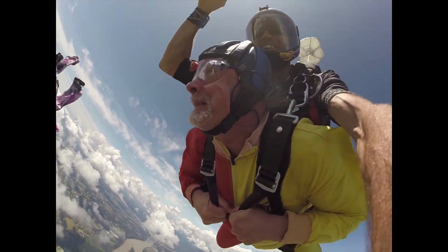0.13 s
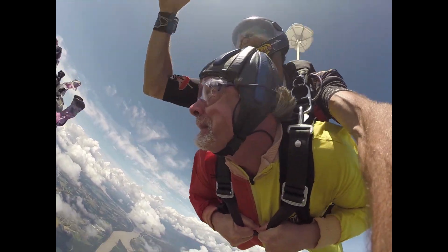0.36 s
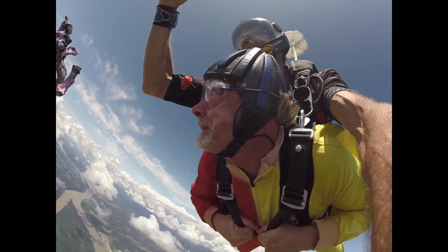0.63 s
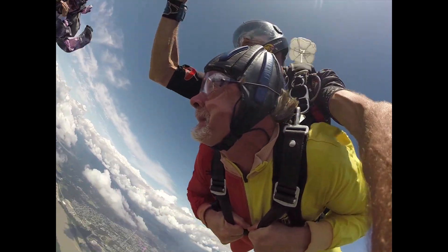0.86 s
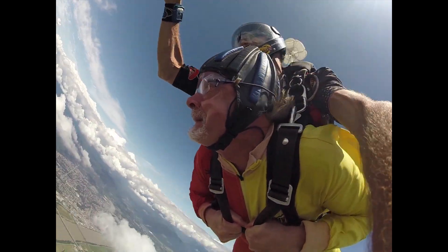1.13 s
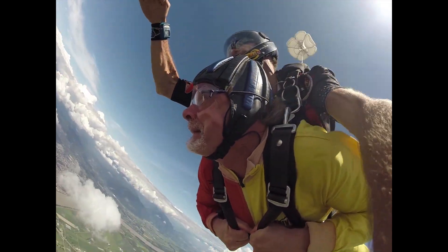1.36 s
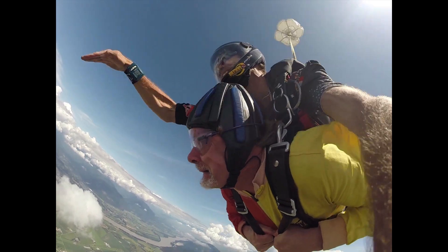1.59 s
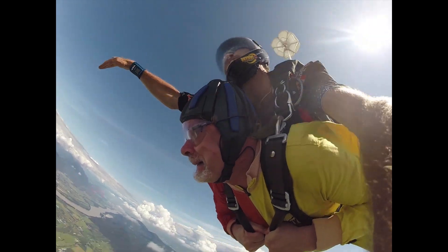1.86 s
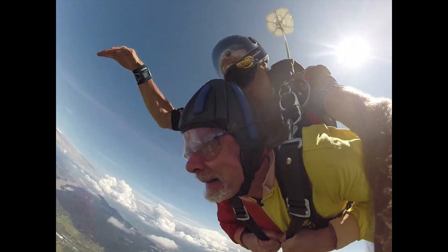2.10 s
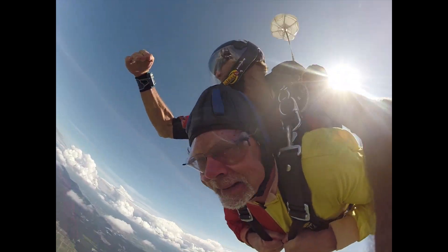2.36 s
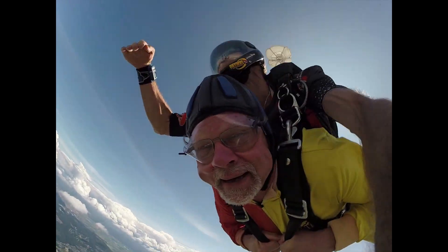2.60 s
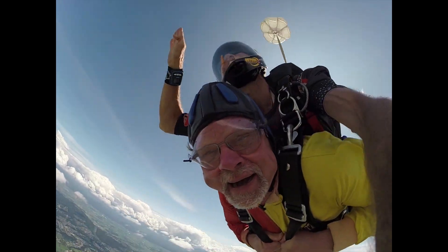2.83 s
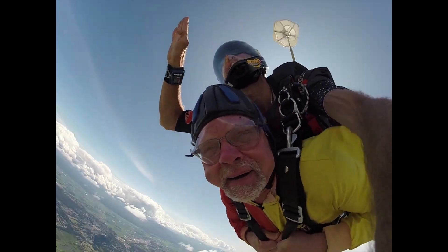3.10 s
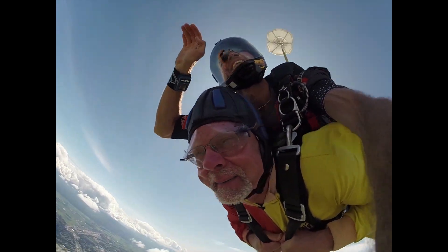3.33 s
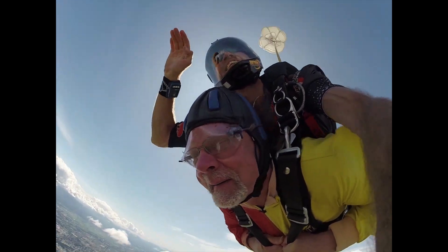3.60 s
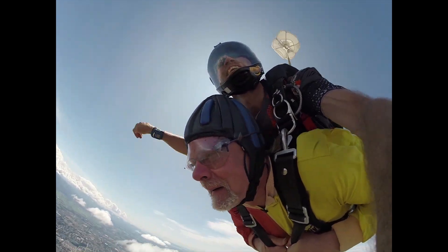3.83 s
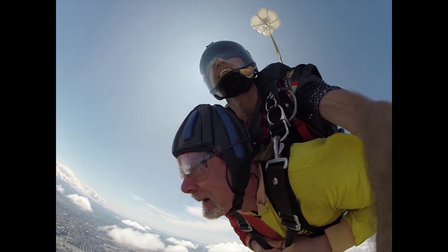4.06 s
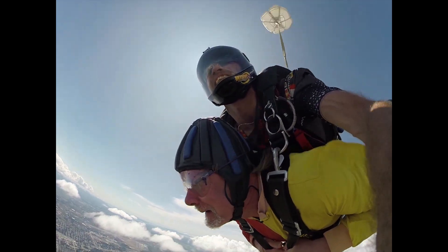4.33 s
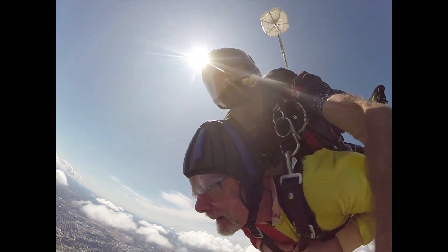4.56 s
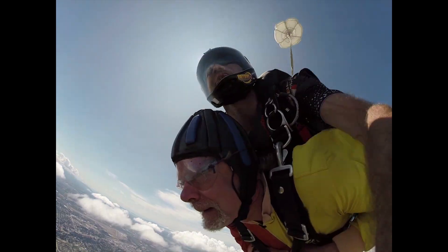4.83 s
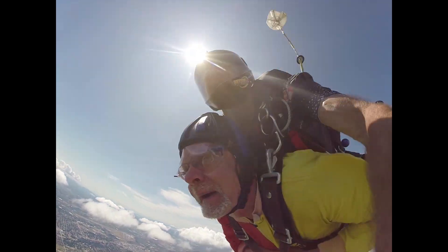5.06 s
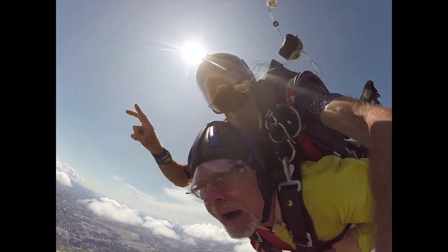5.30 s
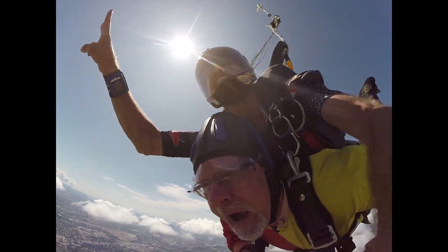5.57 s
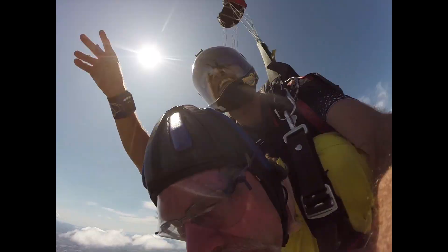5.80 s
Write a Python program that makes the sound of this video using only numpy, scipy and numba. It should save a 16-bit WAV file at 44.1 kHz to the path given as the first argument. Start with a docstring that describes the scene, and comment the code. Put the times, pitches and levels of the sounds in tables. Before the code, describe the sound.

Loud continuous freefall wind roars and buffets against an overloaded handheld camera microphone, gusting unevenly and gathering into a rising howl at the end.

```python
"""Freefall wind on a camera microphone

In the open air the airstream tears over the small port of a handheld camera microphone.
Big eddies buffet (low noise), smaller ones shed at the port roar (noise below a moving corner),
fine turbulence hisses on top (noise in half-octave bands). The pressure overloads the capsule, which
flattens the wave; the camera then evens the level and trims the bass and the top.
As the camera turns, the roar gathers into a rising howl (noise in a moving resonance)."""
import sys
import numpy as np
from scipy import signal
from scipy.io import wavfile
from scipy.ndimage import uniform_filter1d
from numba import njit

SR = 44100
rng = np.random.default_rng(int(sys.argv[2]) if len(sys.argv) > 2 else 0)


def pcm_store(signal):
    """Save signal as 16-bit PCM."""
    levels = np.round(np.clip(np.atleast_2d(signal), -1, 1) * 32767)
    wavfile.write(sys.argv[1], SR, levels.astype(np.int16).T)


def convert_level_to_amplitude(level_db):
    """Map a level in decibels to its linear amplitude factor."""
    exponent = np.asarray(level_db, float) / 20
    return 10 ** exponent


N = 261498

# colour of fine turbulence ahead of the port: (frequency [Hz], relative density [dB per Hz])
HISS_COLOUR = [(500, -4), (900, -0.5), (1500, -7.5), (2400, -10.5), (3400, -19.5), (5000, -21.5),
               (8000, -24.5), (13000, -27.5)]
# airstream at the port as the camera turns:
# (time [s], pressure [dB], eddy shedding rate [Hz], fine turbulence [dB])
FLOW = [(0.0, -8.5, 344, -19), (0.3, -8, 290, -19), (0.6, -11.5, 253, -21.5), (0.9, -11, 270, -20.5),
        (1.35, -11.5, 262, -21.5), (1.7, -9.5, 303, -22), (1.9, -10, 363, -23), (2.2, -6, 370, -21.5),
        (2.6, -6, 390, -22), (3.0, -5, 382, -20), (3.9, -6.5, 396, -20), (4.25, 0, 409, -20),
        (4.75, -2, 489, -20), (5.05, 0, 426, -18), (5.37, 0.5, 600, -18.5), (5.45, 0, 455, -17),
        (5.6, 1, 630, -20), (5.68, 0, 625, -15), (5.76, -1.5, 780, -16), (5.86, -7.5, 930, -15),
        (5.93, -16.5, 960, -16.5)]
# gusts: (peak time [s], level [dB], swell [s], added brightness [dB per two octaves])
GUSTS = [(0.22, 4, 0.42, -1), (0.66, 2, 0.12, 1), (1.18, 5, .1, -2.5), (1.6, 6, 0.25, -1),
         (2.38, -0.5, 0.11, 1.5), (2.52, -0.5, .08, 3), (3.09, -0.5, 0.047, 4.5), (3.2, 0, 0.07, 5),
         (3.33, 0.5, 0.071, 0.5), (4.2, 5.5, .12, -1.5), (4.67, 5, .2, 0), (5.37, 9, 0.15, -2),
         (5.85, 7, 0.16, -0.5)]

BREAK_S = 0.04   # fall of a gust
GUST_IN_ROAR, GUST_IN_BUFFET = 0.4, 0.42   # shares of a gust's dB
SHEDDING_HZ = 400   # reference rate for the per-octave settings

BUFFET_LOW_HZ, BUFFET_HIGH_HZ = 21.6, 179
BUFFET_DB = -10   # at 0 dB pressure and SHEDDING_HZ
BUFFET_FOLLOWS, BUFFET_DB_PER_OCTAVE = 0.12, -2.5   # dB per dB of pressure, change with shedding rate

ROAR_CORNER_HZ = 252 * 2 ** 0.87   # at SHEDDING_HZ
CORNER_FOLLOWS = 0.67   # octaves per octave of shedding rate
CORNER_DAMPING, DAMPING_PER_OCTAVE = 1.13, -0.11   # at SHEDDING_HZ, change with rate
ROAR_FROM_HZ = 113.7

BRIGHT_DB_PER_2_OCTAVES = 4   # between gusts, above 2 kHz
PORT_HZ, PORT_WIDTH_HZ, PORT_DB = 3490, 670, -3.5   # ringing; level against the direct sound

HOWL_DAMPING, HOWL_TIGHTENS = 0.14, 0.6   # at SHEDDING_HZ, exponent of narrowing with rate
HOWL_DB = -8   # at 0 dB pressure and SHEDDING_HZ
HOWL_FOLLOWS, HOWL_DB_PER_OCTAVE = 1.66, 2.5   # dB per dB of pressure, change with rate

CAPSULE_UP, CAPSULE_DOWN, KNEE = 1, 0.8, 1.33   # limits of swing, hardness of the knee
STEEPEN_S = 4e-5   # lead per unit of swing
BASS_CUT_HZ, TOP_CUT_HZ, EDGE_HZ = 100, 3870, 13980
SELF_NOISE_DB, SELF_NOISE_HZ = -74, (7000, 15000)   # rms ahead of the edge filter, band


def rms_one(x):
    """Scaled to unit rms."""
    return x / np.sqrt(np.mean(x ** 2) + 1e-20)


def drift(rate_hz):
    """Slow chance of spread 1: noise twice through a one-pole low-pass."""
    pole = np.exp(-2 * np.pi * rate_hz / SR)
    noise = rng.standard_normal(N + SR)
    slow = signal.lfilter([1], [1, -2 * pole, pole * pole], noise)
    return rms_one(slow[SR:])   # settled part


def band(x, low_hz, high_hz):
    """Butterworth band-pass, second order per edge."""
    sos = signal.butter(2, [low_hz, high_hz], "band", fs=SR, output="sos")
    return signal.sosfilt(sos, x)


@njit
def moving_filter(x, step, damping):
    """Two-pole filter whose corner moves sample by sample: low-pass and band-pass outputs."""
    out, low, mid = np.empty((2, len(x))), 0., 0.
    for i in range(len(x)):
        low += step[i] * mid
        mid += step[i] * (x[i] - low - damping[i] * mid)
        out[0, i], out[1, i] = low, mid
    return out


def in_time(rows):
    """Table columns after the time, one value per sample."""
    time_s, *columns = np.transpose(rows)
    return [np.interp(np.arange(N) / SR, time_s, column) for column in columns]


def gust_swells():
    """Gusts swell and break off along bell-shaped flanks: added level and brightness."""
    t = np.arange(N) / SR
    total = np.zeros((2, N))
    for peak_s, level_db, swell_s, bright_db in GUSTS:
        flank_s = np.where(t < peak_s, swell_s, BREAK_S)
        bell = np.exp(-((t - peak_s) / flank_s) ** 2)
        total += np.outer([level_db, bright_db], bell)
    return total


def buffet(level_db, lumpy_db):
    """Large eddies: low noise of uneven strength."""
    noise = band(rng.standard_normal(N + SR), BUFFET_LOW_HZ, BUFFET_HIGH_HZ)[SR:]
    lumpy = noise * convert_level_to_amplitude(lumpy_db * drift(14))
    return convert_level_to_amplitude(level_db) * rms_one(lumpy)


def roar(level_db, corner_hz, damping, flutter_db, waver_octaves):
    """Eddies shed at the port: flat noise up to a wavering corner that rises with the shedding rate."""
    step = 2 * np.pi * corner_hz * 2 ** (waver_octaves * drift(12.3)) / SR
    damping = np.clip(damping, 0.3, 1.8)
    noise = moving_filter(rng.standard_normal(N), step, damping)[0]
    noise = signal.lfilter(*signal.butter(2, ROAR_FROM_HZ, "high", fs=SR), noise)
    even = noise * np.sqrt(damping / corner_hz)   # a wider or peakier band carries more power
    return convert_level_to_amplitude(level_db) * rms_one(even * convert_level_to_amplitude(flutter_db))


def port(x):
    """Fine turbulence sets the air in the short tube before the capsule ringing broadly."""
    r = np.exp(-np.pi * PORT_WIDTH_HZ / SR)
    poles = [2, -4 * r * np.cos(2 * np.pi * PORT_HZ / SR), 2 * r * r]
    ring = signal.lfilter([1 - r * r, 0, r * r - 1], poles, x)
    return x + convert_level_to_amplitude(PORT_DB) * ring


def hiss(level_db, bright_db, flutter_db, spit_db, patchy_db):
    """Fine turbulence: half-octave bands share gusts and quick spits and also flicker on their own."""
    hz, density_db = np.transpose(HISS_COLOUR)
    edges_hz = 400 * 2 ** np.arange(0, 5.6, 0.5)
    white = rng.standard_normal((2, N))   # neighbouring bands alternate
    spits = drift(150)
    out = 0
    for k, (low_hz, high_hz) in enumerate(zip(edges_hz, edges_hz[1:])):
        colour_db = np.interp(np.log(low_hz * high_hz) / 2, np.log(hz), density_db)
        tilt_db = bright_db * max(np.log2(low_hz / 2000), 0) * 0.5   # only the top octaves
        gain = convert_level_to_amplitude(colour_db + tilt_db + patchy_db * drift(33))
        out = out + band(white[k % 2], low_hz, high_hz) * gain
    return convert_level_to_amplitude(level_db) * rms_one(port(out) * convert_level_to_amplitude(flutter_db + spit_db * spits))


def howl(hz, level_db, damping, waver_octaves):
    """Shedding that falls nearly into step: noise in a loose, wavering resonance."""
    step = 2 * np.pi * hz * 2 ** (waver_octaves * drift(9.8)) / SR
    noise = moving_filter(rng.standard_normal(N), step, damping)[1]
    even = noise * np.sqrt(damping / hz)
    return convert_level_to_amplitude(level_db) * rms_one(even)


def scene():
    """Pressure, shedding rate and gusts drive the layers; a small flutter moves roar and hiss together."""
    flow_db, shedding_hz, fine_db = in_time(FLOW)
    swell_db, bright_db = gust_swells()
    octaves = np.log2(shedding_hz / SHEDDING_HZ)
    flutter = drift(9)

    buffet_db = BUFFET_DB + BUFFET_FOLLOWS * flow_db + BUFFET_DB_PER_OCTAVE * octaves
    air = buffet(buffet_db + GUST_IN_BUFFET * swell_db, lumpy_db=2.0)

    corner_hz = ROAR_CORNER_HZ * 2 ** (CORNER_FOLLOWS * octaves)
    corner_damping = CORNER_DAMPING + DAMPING_PER_OCTAVE * octaves
    air = air + roar(flow_db + GUST_IN_ROAR * swell_db, corner_hz, corner_damping,
                     flutter_db=0.38 * flutter, waver_octaves=0.092)

    air = air + hiss(fine_db + swell_db, BRIGHT_DB_PER_2_OCTAVES + bright_db,
                     flutter_db=0.39 * flutter, spit_db=0.14, patchy_db=0.4)

    howl_db = HOWL_DB + HOWL_FOLLOWS * flow_db + HOWL_DB_PER_OCTAVE * octaves
    howl_damping = HOWL_DAMPING * (SHEDDING_HZ / shedding_hz) ** HOWL_TIGHTENS
    air = air + howl(shedding_hz, howl_db, howl_damping, waver_octaves=0.04)
    return air[None]


def capsule(pressure):
    """Overload flattens the wave unevenly; crests run ahead of troughs, so it rises faster than it falls."""
    limit = np.where(pressure > 0, CAPSULE_UP, CAPSULE_DOWN)
    x = pressure / (1 + (np.abs(pressure) / limit) ** KNEE) ** (1 / KNEE)
    samples = np.arange(N)
    return np.interp(samples + STEEPEN_S * SR * x[0], samples, x[0])[None]


def gain_control(x, seconds, knee_db, squeeze):
    """Slow automatic gain: power above the knee is turned down by a share."""
    power = uniform_filter1d(x ** 2, int(seconds * SR), axis=-1)
    excess_db = np.maximum(10 * np.log10(power) - knee_db, 0)
    return x * convert_level_to_amplitude(-squeeze * excess_db)


def band_limit(x):
    """A steep low-pass at the top of the band."""
    return signal.sosfilt(signal.butter(12, 14140, fs=SR, output="sos"), x)


def record(dry):
    """Capsule, automatic gain, a one-pole bass cut that tilts the flat tops, top roll-off, self-noise."""
    x = capsule(dry)
    x = gain_control(x, seconds=0.19, knee_db=-13, squeeze=0.58)
    x = signal.lfilter([1, -1], [1, -np.exp(-2 * np.pi * BASS_CUT_HZ / SR)], x)
    x = signal.lfilter(*signal.butter(2, TOP_CUT_HZ, fs=SR), x)
    electronics = band(rng.standard_normal(N), *SELF_NOISE_HZ)
    x = x + convert_level_to_amplitude(SELF_NOISE_DB) * rms_one(electronics)
    mix = signal.sosfilt(signal.cheby2(20, 50, EDGE_HZ, fs=SR, output="sos"), x)   # steep top edge
    return band_limit(mix)


dry = scene()
out = record(dry)
pcm_store(out)
```